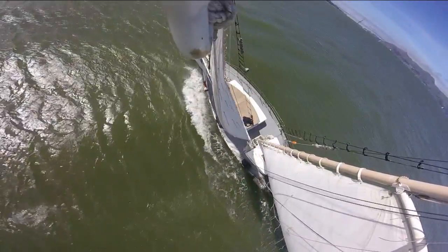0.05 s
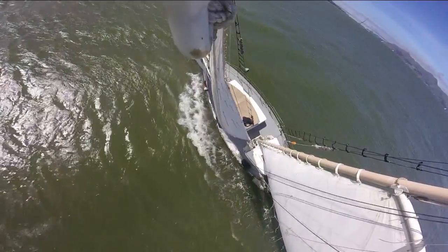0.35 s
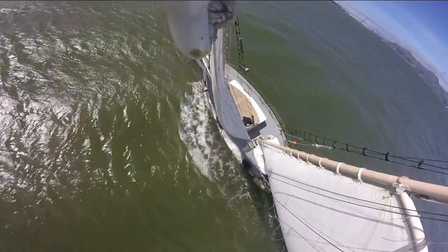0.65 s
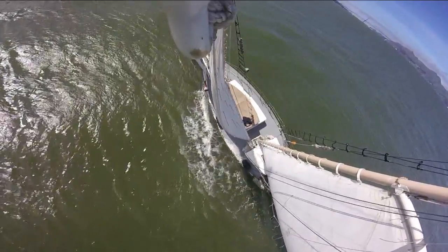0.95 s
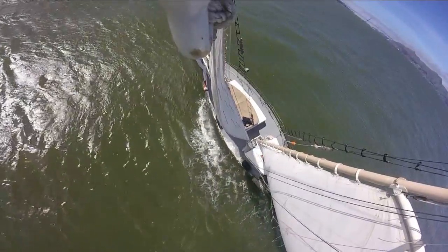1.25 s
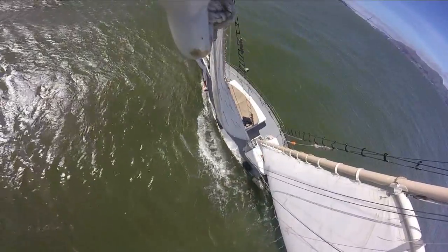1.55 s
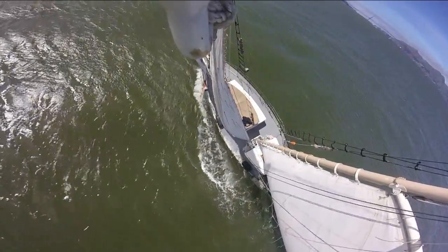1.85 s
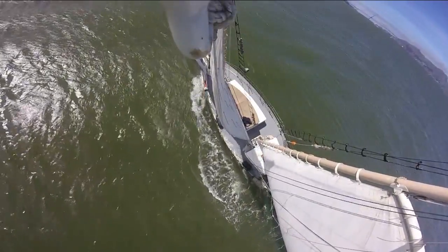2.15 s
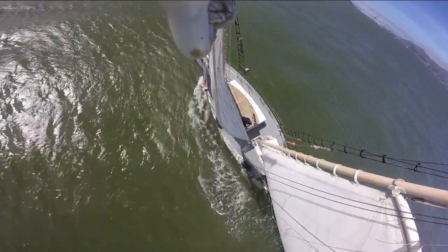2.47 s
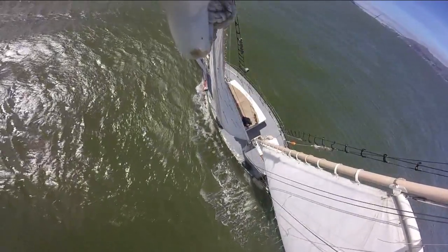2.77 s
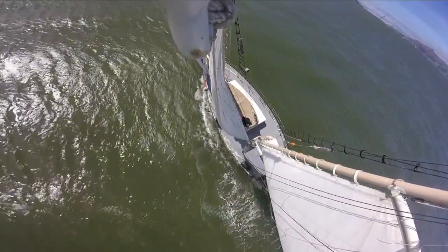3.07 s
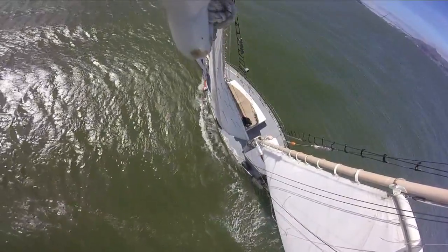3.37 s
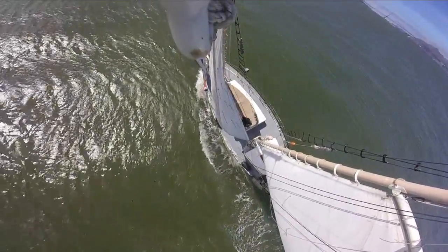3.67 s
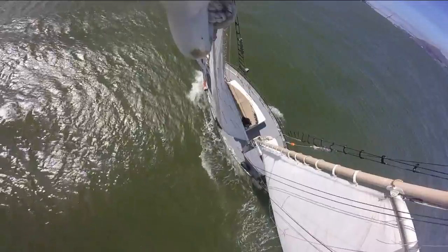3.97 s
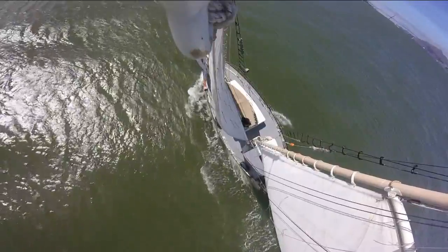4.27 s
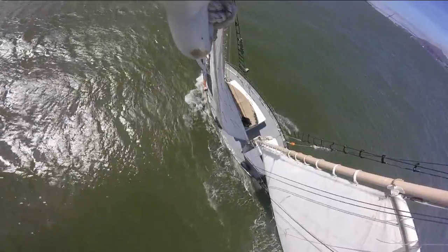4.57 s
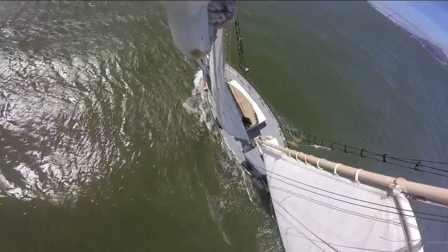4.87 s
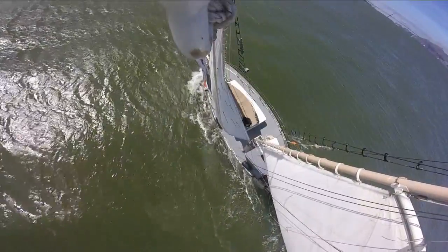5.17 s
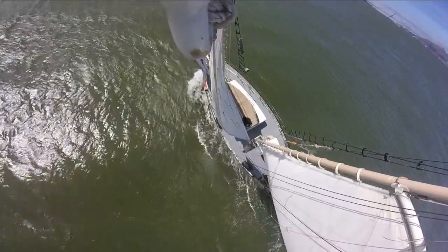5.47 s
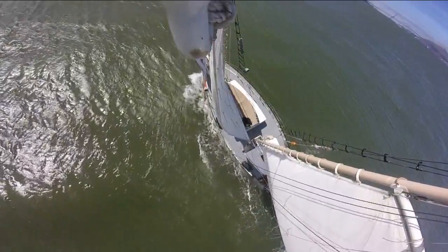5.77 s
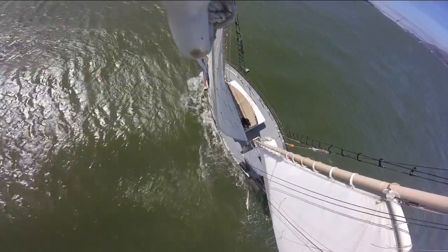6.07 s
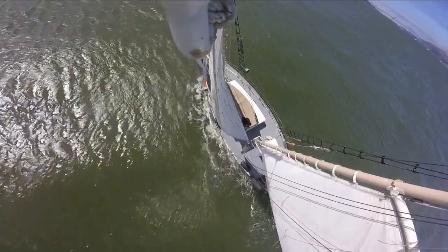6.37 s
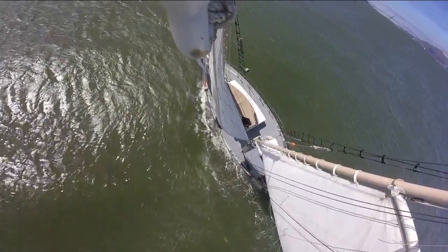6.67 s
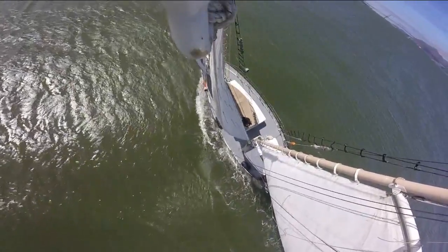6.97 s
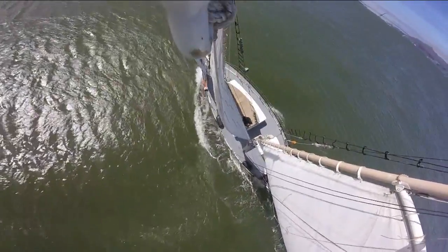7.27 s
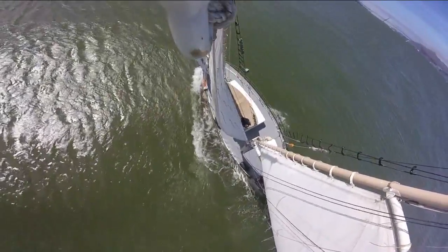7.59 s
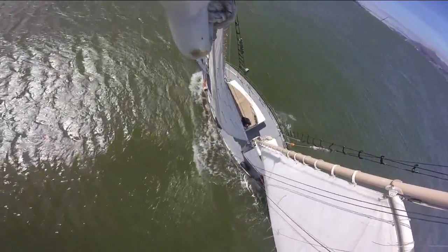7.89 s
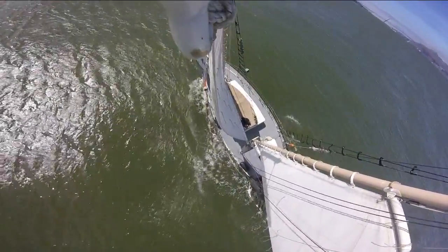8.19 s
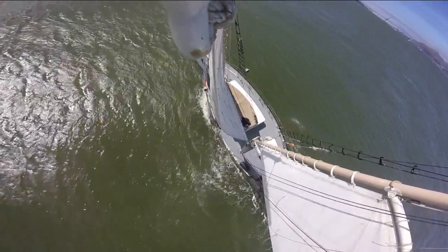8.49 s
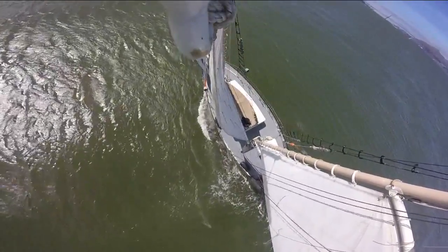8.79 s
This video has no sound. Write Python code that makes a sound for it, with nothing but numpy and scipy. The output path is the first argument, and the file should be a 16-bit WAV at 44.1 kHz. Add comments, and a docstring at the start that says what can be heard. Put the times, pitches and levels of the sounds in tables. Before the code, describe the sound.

A low, throbbing wind hum runs for the whole nine seconds on a microphone high on a sailing boat's mast, with brief gusts near 3.2, 6.1 and 7.3 seconds. Beneath it lie a faint wash of air and water, soft rope rubbing on sailcloth and tiny ticks from fittings. Rigging blocks knock close by from 1.5 seconds, with a sharp clack at 2.3 and more around 3.2, 4.6 and 5. A wooden spar gives short creaks at 2.4 and 3.1 seconds, then an uneven run of knocking creaks from 3.8 to 5.6. Faster, buzzing creaks follow at about 6, 6.5 and 7 seconds. The loudest sound, a hard ringing knock, lands at 7.15, with smaller clacks just after. Another fast creak comes at 7.5, and lighter creaks and bumps continue from 8 seconds to the end.

```python
"""Wind buffets the microphone and hums in its mount, over a soft wash of air and water.
The camera is clamped high on the mast of a wooden sailing boat under way, above a light chop.
Close by, rope rubs on cloth, fittings tick and blocks bump the mast. A loaded spar sticks and
slips as the boat rolls, ringing in single knocks and fast creaks."""
import sys
import numpy as np
from scipy import signal
from scipy.fft import rfft, irfft, next_fast_len
from scipy.io import wavfile
from scipy.ndimage import uniform_filter1d

SR = 44100
rng = np.random.default_rng(int(sys.argv[2]) if len(sys.argv) > 2 else 0)


def pcm_store(signal):
    """Save signal as 16-bit PCM."""
    levels = np.round(np.clip(np.atleast_2d(signal), -1, 1) * 32767)
    wavfile.write(sys.argv[1], SR, levels.astype(np.int16).T)


N = 389752
TIME = np.arange(N) / SR
RING = np.arange(SR // 4) / SR  # the time that one blow rings

# Level of the wash of air and water, briefly ducked by the camera after the loudest knock.
# Each row: time in seconds, relative level in dB.
WASH_LEVELS = [(0, -43), (.7, -44), (1, -46.5), (1.4, -46), (1.7, -43.3), (2.2, -47), (3.1, -45.5),
               (4.5, -47.5), (5.7, -44), (6.2, -47.5), (6.6, -45.5), (7.35, -48.5), (7.8, -47),
               (8.45, -48.7), (8.84, -46.5)]
# The hum of the wind in the mount. Each row: time in seconds, relative level in dB.
WIND_LEVELS = [(0, -19), (.6, -23.5), (1.55, -18), (1.8, -22.5), (3.05, -19), (3.19, -10), (3.27, -18.5),
               (3.6, -24.5), (4.95, -18), (5.7, -22), (6.02, -18.5), (6.12, -11), (6.22, -20.5),
               (6.45, -18), (6.85, -27), (7.25, -16), (7.36, -25.5), (7.82, -20), (8.4, -24), (8.84, -19)]
# Noise spectra. Each row: frequency in Hz, relative level in dB.
WASH_SPECTRUM = [(250, -2.5), (450, -2), (700, 0), (840, 4), (1020, -8.5), (1250, 2.5), (2100, -2.5),
                 (2350, 3.5), (2700, -8), (3500, -10), (4500, -19.5), (6500, -38), (8800, -37),
                 (10000, -38), (13500, -43), (15800, -65)]  # air and foam far below
HUM_SPECTRUM = [(20, -51.5), (70, -36), (100, -13.5), (118, 0.5), (136, 0.5), (155, -13), (180, -28),
                (250, -38), (330, -55.5), (500, -64), (900, -92)]  # the resonating mount
BUFFET_SPECTRUM = [(20, -1), (40, 1), (55, -0.5), (90, -1.5), (170, -4.5), (250, -16), (330, -33.5),
                   (500, -46.5), (900, -69.5)]  # eddies on the microphone
RUB_SPECTRUM = [(700, -27.5), (1300, -11), (2100, -3.5), (2380, 10), (2750, -2.5), (3600, -3),
                (4100, -20.5), (5000, -27.5), (6100, -25), (7500, -34), (15000, -51.5)]  # rope on cloth
SCRAPE_SPECTRUM = [(500, -13.5), (1300, 11.5), (3200, 4.5), (4500, -20), (7300, -12.5), (8500, -23.5),
                   (11000, -30.5), (15000, -36)]  # the slipping spar
# Long pulls of rope. Each row: middle in seconds, half length in seconds, relative level in dB.
ROPE_PULLS = [(.04, .05, -42), (.262, .02, -39), (.613, .028, -38.5), (.725, .045, -41), (1.113, .024, -39),
              (1.331, .012, -32.5), (1.657, .029, -39), (1.741, .023, -35), (2.032, .017, -40),
              (2.808, .008, -35), (3.457, .019, -41.5), (4.47, .035, -43), (5.287, .009, -36.5),
              (5.406, .013, -38), (5.763, .016, -39), (6.223, .012, -35.5), (6.729, .017, -34),
              (6.952, .022, -37.5)]
# The clearest shackles and hoops. Each row: start in seconds, level in dB, centre in Hz.
FITTING_TICKS = [(.515, -38, 2900), (1.075, -51, 7000), (1.4726, -45.5, 7000), (1.749, -27, 813),
                 (1.937, -48, 7500), (2.1885, -51, 7000), (2.3514, -46, 6500), (3.3798, -50, 7000),
                 (3.9361, -45, 6500), (4.629, -33, 2600), (4.8874, -45, 6900), (5.3496, -47.5, 6500),
                 (5.474, -44, 6600), (6.0243, -30, 3200), (6.026, -37, 5600), (6.079, -25, 2600),
                 (7.147, -14, 831), (7.148, -30, 4300), (7.2115, -15.5, 2670), (8.204, -51, 7000),
                 (8.4682, -51.5, 6840)]
# Blocks hitting the mast. Each row: start in seconds, relative level in dB,
# treble tilt in dB per octave, relative thump of the mount in dB.
BLOCK_BUMPS = [(1.5135, -19, 2.5, -10.5), (1.7475, -26.5, -5, -37), (1.9216, -26.5, 1.5, -25),
               (2.3105, -33, 4, -38), (2.318, -13, 6, -4.5), (2.7323, -28, -4.5, -20),
               (2.8785, -25, -1, -19), (3.1548, -19, 2, -16), (3.3093, -20.3, 0, -28),
               (4.5795, -21, 2.5, -22), (5.0058, -22, 3, -32), (5.5329, -27, -9, -11),
               (7.0335, -24.5, -7, -35), (7.146, -10, 3.5, -17), (7.235, -23, 6, -13.5),
               (7.9035, -37, -4, -37.5), (8.1185, -29.5, -3, -19), (8.7741, -30, -9, -24)]
# Modes. Each row: frequency in Hz, relative level in dB, t60 in seconds (capped for the spar).
BLOCK_MODES = [(663, -6.5, 0.058), (848, -11.5, 0.15), (1150, -10.5, 0.1), (1213, -7, 0.097),
               (1363, 0.5, 0.03), (1545, -2.5, 0.028), (1684, -5.5, .08), (1880, -10.5, 0.092),
               (2000, -17.5, 0.084), (2360, -18, 0.15), (2720, -16.5, 0.051), (3010, -18.5, 0.062),
               (3150, -28, 0.07), (3700, -34.5, 0.044)]
SPAR_MODES = [(645.2, 7, 0.044), (668.3, -6.5, 0.14), (790, 20, 0.0017), (837, -3, 0.056),
              (880, -25.5, 0.46), (1124, -10, 0.043), (1246, -17, 0.13), (1299, -24, 0.193),
              (1462, -20.5, 0.09), (1743, -2.5, 0.069), (1938, -14, 0.24), (1970, 2.5, 0.034),
              (2006, -8, 0.066), (2336, -9, 0.1), (2437, 3.5, 0.024), (2380, -21, 0.11),
              (2730, -31.3, 0.16), (2910, -23, 0.13), (3130, 3.5, 0.013), (3300, -22, 0.11),
              (3610, -25, 0.037), (4130, -22, 0.053), (5100, -24, 0.03)]
SPAR_OUTER_MODES = [(250, -9.5, 0.11), (6400, -44.5, .04), (7660, -40.5, 0.037)]  # its deep bending mode and its faint top
# Creaks of the spar. Each row: first and last slip in seconds, number of slips,
# ratio of last gap to first, first and last relative level in dB.
SPAR_CREAKS = [(.171, .171, 1, 1, -36, -36), (2.4138, 2.4781, 4, 1.37, -17.7, -19.7),
               (3.1214, 3.1716, 3, 1.44, -18.8, -20), (3.8371, 3.857, 2, 1, -20.5, -19.5),
               (3.9163, 3.9163, 1, 1, -27, -27), (4.1003, 4.1003, 1, 1, -20, -20),
               (4.1306, 4.1994, 5, .82, -21, -27.5), (4.2182, 4.2561, 3, 1.04, -24, -24.5),
               (4.6742, 4.7921, 4, .85, -26, -20), (4.8368, 4.9797, 6, .8, -22.5, -20),
               (5.0094, 5.1937, 4, 2.2, -22, -18.5), (5.583, 5.62, 2, 1, -18, -19.3),
               (5.92, 6.071, 25, 1.06, -21, -30.5), (6.409, 6.451, 6, 1, -31, -27),
               (6.4632, 6.572, 7, 1.7, -25.5, -20), (7.04, 7.172, 20, .93, -19.5, -26),
               (7.1818, 7.2128, 3, .77, -27, -19.5), (7.4425, 7.641, 30, 1.5, -21.5, -33.5),
               (7.657, 7.707, 4, 1, -38, -32), (7.995, 7.995, 1, 1, -37, -37),
               (8.0153, 8.0362, 2, 1, -25.5, -22), (8.245, 8.285, 7, 1.08, -23.5, -29.5),
               (8.292, 8.341, 4, 1, -33, -35), (8.544, 8.61, 4, 1, -43, -33),
               (8.6258, 8.6865, 4, 1.55, -29, -22.5)]


def undb(db):
    """Decibels to gain."""
    return 10 ** (np.asarray(db) / 20)


def unit(x):
    """Scale to rms 1."""
    return x / np.sqrt(np.mean(x ** 2))


def add(out, s, sound):
    """Mix a sound in from time s."""
    i = max(int(s * SR), 0)
    out[i:i + len(sound)] += sound[:max(N - i, 0)]


def curve(rows):
    """Rows of (s, value) joined by straight lines."""
    return np.interp(TIME, *np.transpose(rows))


def shape(x, db_of_hz):
    """Filter by a gain in dB given as a function of frequency."""
    size = next_fast_len(len(x))
    hz = np.maximum(np.arange(size // 2 + 1) * SR / size, 1)
    return irfft(rfft(x, size) * undb(db_of_hz(hz)), size)[:len(x)]


def noise(spectrum):
    """Noise of rms 1 with a spectrum of (Hz, dB) points."""
    points, db = np.transpose(spectrum)
    return unit(shape(rng.standard_normal(N), lambda hz: np.interp(np.log(hz), np.log(points), db)))


def burst(centre_hz, octaves):
    """Short noise of rms 1 in a steep band around a pitch."""
    white = rng.standard_normal(len(RING))
    return unit(shape(white, lambda hz: -20 * np.log10(1 + (np.log2(hz / centre_hz) / octaves) ** 4)))


def walk(rate):
    """Smooth random drift of rms 1 that changes about rate times a second."""
    k = max(int(SR / rate), 1)
    held = np.repeat(rng.standard_normal(N // k + 1), k)
    return unit(uniform_filter1d(uniform_filter1d(held, k), k)[:N])


def fade(t60, rise_s):
    """Envelope of a blow: a quick rise and an exponential decay."""
    return (1 - np.exp(-RING / rise_s)) * np.exp(-np.log(1000) * RING / t60)


def mode(hz, t60, rise_s, turns=0):
    """One struck resonance: a dying sine."""
    return fade(t60, rise_s) * np.sin(2 * np.pi * (hz * RING + turns))


def wash(body_db=-3, fizz_db=-23):
    """Air and foam far below the microphone: a soft, restless wash with a thin fizz on top."""
    fizz = noise([(3500, -13), (6000, 0), (7600, -5.5), (8800, -1.5),
                  (10000, -13), (13000, -16), (15500, -39)])
    body = noise(WASH_SPECTRUM) * undb(body_db + .3 * walk(14))
    return undb(curve(WASH_LEVELS)) * (body + fizz * undb(fizz_db + .5 * walk(8)))


def wind(hum_db=-.4, steadiness=.75, buffet_db=-35):
    """Eddies rumble on the microphone and keep the mount humming; the gusts set how hard."""
    hum = noise(HUM_SPECTRUM)
    power = uniform_filter1d(uniform_filter1d(hum ** 2, SR // 11), SR // 11)
    hum = unit(hum / power ** (steadiness / 2))  # the wind's steady push partly evens out the throb
    buffet = noise(BUFFET_SPECTRUM) * undb(buffet_db + walk(6.5))
    return hum * undb(curve(WIND_LEVELS) + hum_db) + buffet


def rope(rub_db=-1.5, idle_db=-15, grain_db=4, count=70, twitch_db=-3, twitch_s=.011):
    """Rope catches on sailcloth fibre by fibre: long pulls, and twitches that follow the wash's level."""
    wash_db = curve(WASH_LEVELS)
    power = undb(wash_db + idle_db + 4 * walk(25)) ** 2
    effort_db = wash_db.mean() + 1.5 * (wash_db - wash_db.mean())
    twitches = []
    for k, (when, length, strong) in enumerate(rng.random((count, 3))):
        i = int((k + when) / count * N)
        db = effort_db[i] + twitch_db + 1.5 * (2 * strong - 1)
        twitches.append((TIME[i], twitch_s * (.5 + length), db))
    for s, half_s, db in list(ROPE_PULLS) + twitches:
        power += undb(db + rub_db) ** 2 * np.exp(-np.minimum(((TIME - s) / half_s) ** 2, 20))
    fibres = unit(noise(RUB_SPECTRUM) * undb(grain_db * walk(300)))
    return np.sqrt(power) * fibres


def faint_ticks(count=44, tick_db=-57.5, spread_db=2, centre_hz=6500):
    """Tiny random ticks from the rest of the rigging; the high ones are fainter."""
    out = np.zeros(N)
    for when, strong, high in rng.random((count, 3)):
        octave = high - .5
        tick = burst(centre_hz * 2 ** octave, .5) * fade(t60=.055, rise_s=.002)
        db = tick_db + spread_db * (2 * strong - 1) - 5 * octave
        add(out, when * N / SR, undb(db) * tick)
    return out


def fittings(small_hz=7000, small_t60=.023, small_octaves=.46, snap_db=-23, rise_s=.00049):
    """Fittings tick with a bright snap; the bigger and lower one is, the longer and purer it rings."""
    out = np.zeros(N)
    for s, db, centre_hz in FITTING_TICKS:
        bulk = small_hz / centre_hz
        ring = burst(centre_hz, small_octaves / bulk ** .55) * fade(small_t60 * bulk ** .6, rise_s)
        snap = undb(snap_db) * burst(5100, .5) * fade(.03, rise_s)
        add(out, s, undb(db) * (ring + snap))
    return out


def blocks(block_db=-.3, rattle_db=-4, mast_db=-7.5, thump_db=11, detune=.008, scatter_db=2.5):
    """A block clacks and rattles against the mast, and the blow sets the camera mount swinging."""
    out = np.zeros(N)
    mast = undb(mast_db) * mode(hz=248, t60=.16, rise_s=.005)
    mount = mode(hz=133, t60=.22, rise_s=.028)
    for s, bump_db, tilt_db, mount_db in BLOCK_BUMPS:
        rattle = undb(rattle_db) * burst(1450 * undb(tilt_db / 3), .48) * fade(.052, .00084)
        clack = np.zeros(len(RING))
        for hz, db, t60 in BLOCK_MODES:
            sharp, turns, strong = rng.standard_normal(3)
            gain = undb(db + tilt_db * np.log2(hz / 1400) + scatter_db * strong)
            clack += gain * mode(hz * (1 + detune * sharp), t60, .0018, turns)
        add(out, s, undb(bump_db + block_db) * (rattle + clack + mast))
        add(out, s, undb(mount_db + thump_db) * mount)
    return out


def breakaways(hard_db=-18, crack_db=-24, crack_hz=9000):
    """The heavily loaded spar lets go with a thin, high crack at the start of a creak."""
    out = np.zeros(N)
    for start, _, _, _, first_db, _ in SPAR_CREAKS:
        softness = max(hard_db - first_db, 0)
        crack = burst(crack_hz, .7) * fade(t60=.006, rise_s=.0005)
        add(out, start, undb(first_db + crack_db - 2 * softness) * crack)
    return out


def creak_slips(creak_db=.4, jitter_s=.0003, uneven_db=.7, breakaway_db=1.8):
    """Slips as (s, dB, gap s): gaps and levels glide through a creak; its first slip gets a boost."""
    rows = []
    for start, end, slips, slowing, first_db, last_db in SPAR_CREAKS:
        along = np.linspace(0, 1, int(round(slips)))
        gaps = slowing ** np.linspace(0, 1, len(along) - 1)
        gaps = gaps * (end - start) / max(gaps.sum(), 1)
        late, strong = rng.standard_normal((len(along), 2)).T
        times = start + np.append(0, np.cumsum(gaps)) + jitter_s * late
        db = creak_db + first_db + (last_db - first_db) * along
        db += breakaway_db * (along == 0) + uneven_db * strong
        rows += zip(times, db, np.append(1, gaps))
    return rows


def slip_ring(rings, mode_hz, db, full_db=-20, scatter_db=1.63, detune=.0088):
    """A slip rings the spar, never at quite the same pitch; a weak one lets go softly, so is duller."""
    dulling_db = .57 * max(full_db - db, 0) * np.clip(np.log2(mode_hz / 750), 0, 2)
    gains = undb(db - dulling_db + scatter_db * rng.standard_normal(len(mode_hz)))
    speed = 1 + detune * rng.standard_normal()
    return np.interp(RING * speed, RING, gains @ rings)


def spar(rise_s=.0032, longest_t60=.11, grip_s=.011, scrape_db=-15):
    """The spar sticks and slips: single knocks under heavy load, a buzzing creak as it swings back."""
    modes = list(SPAR_MODES) + list(SPAR_OUTER_MODES)
    mode_hz = np.array(modes)[:, 0]
    gripping, sliding = [], []
    for hz, db, t60 in modes:
        t60 = min(t60, longest_t60)
        gripping.append(undb(db) * mode(hz, t60, rise_s))
        # slipping too fast to grip, the contact damps the wood and drives its upper modes harder
        sliding.append(undb(db + .5 * np.log2(hz / 650)) * mode(hz, .92 * t60, rise_s))
    wood, scrape_power = np.zeros(N), np.zeros(N)
    for s, db, gap in creak_slips():
        rings = np.array(sliding if gap < grip_s else gripping)
        add(wood, s, slip_ring(rings, mode_hz, db))
        # the surfaces scrape for a moment before they grip again
        add(scrape_power, s, (undb(db + scrape_db) * fade(t60=.033, rise_s=.0011)) ** 2)
    return wood + np.sqrt(scrape_power) * noise(SCRAPE_SPECTRUM)


def scene():
    """Wind, water and rigging, heard in mono from the masthead."""
    background = wind() + wash() + rope()
    return (background + blocks() + fittings() + faint_ticks() + spar() + breakaways())[None]


def record(dry):
    """The camera clips at full scale and cuts the top above 15.8 kHz."""
    lowpass = signal.ellip(8, .2, 70, 15800, fs=SR, output="sos")
    return signal.sosfilt(lowpass, np.clip(dry, -1, 1))


dry = scene()
out = record(dry)
pcm_store(out)
```